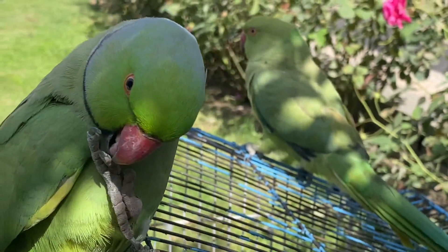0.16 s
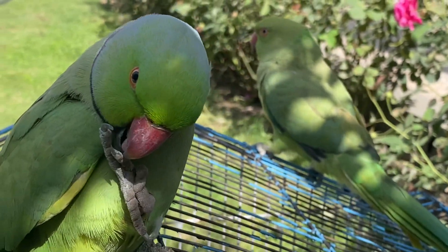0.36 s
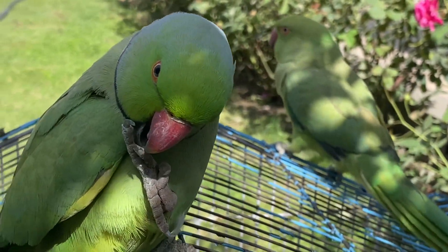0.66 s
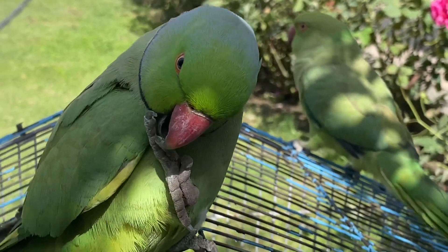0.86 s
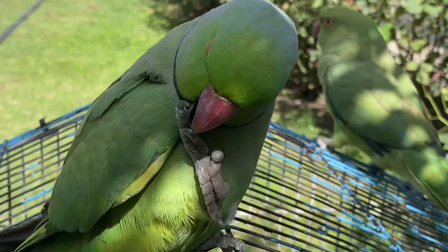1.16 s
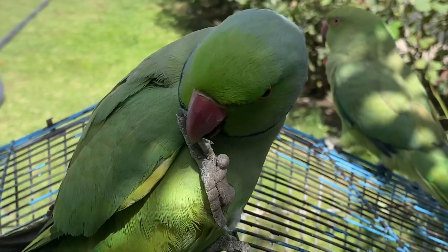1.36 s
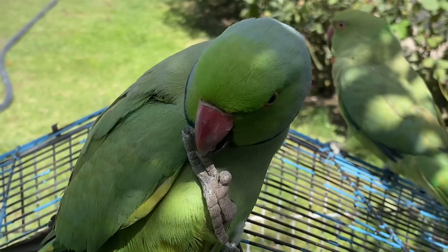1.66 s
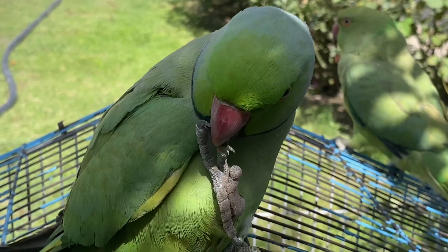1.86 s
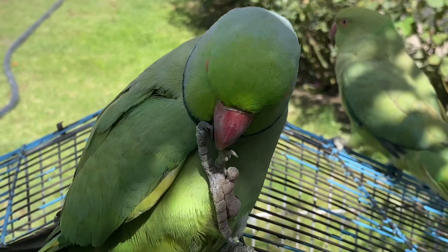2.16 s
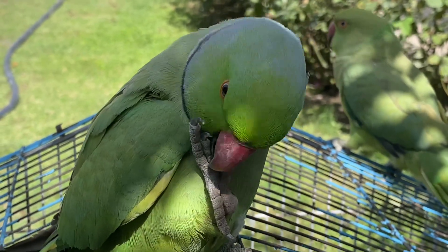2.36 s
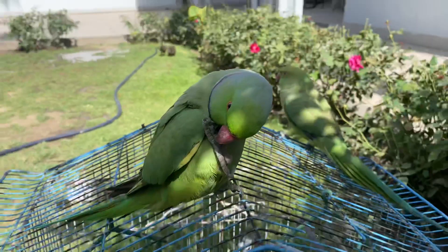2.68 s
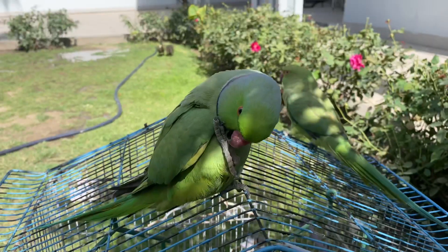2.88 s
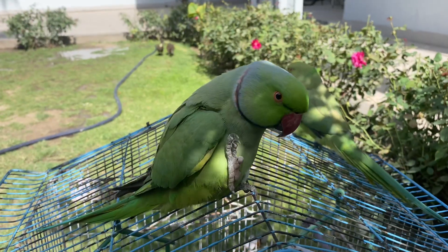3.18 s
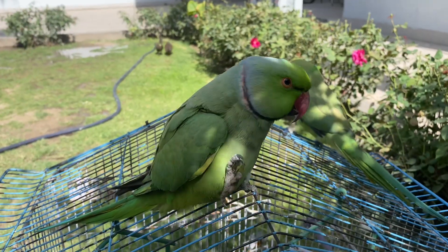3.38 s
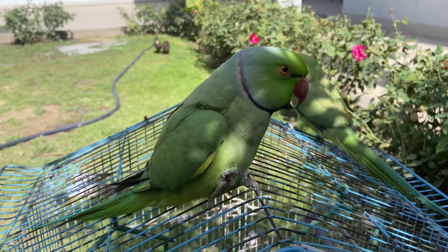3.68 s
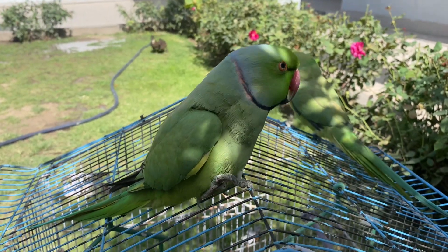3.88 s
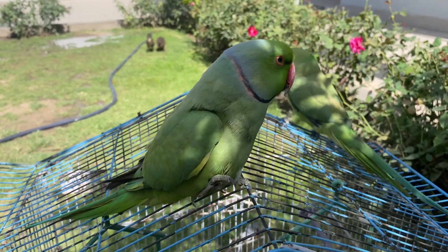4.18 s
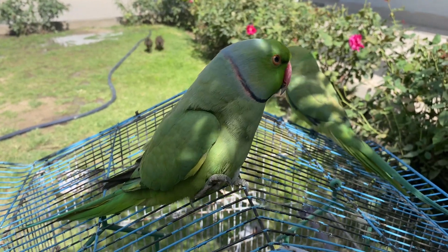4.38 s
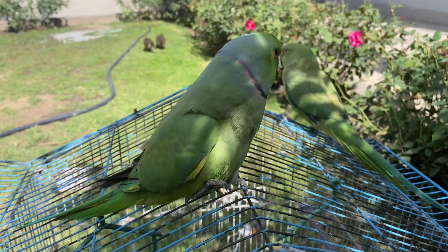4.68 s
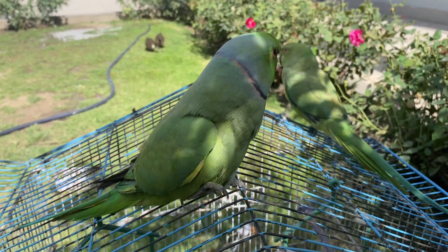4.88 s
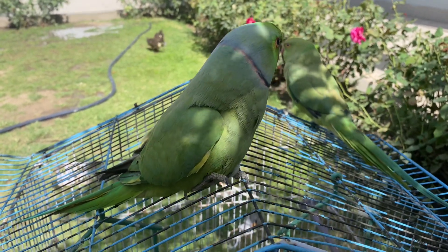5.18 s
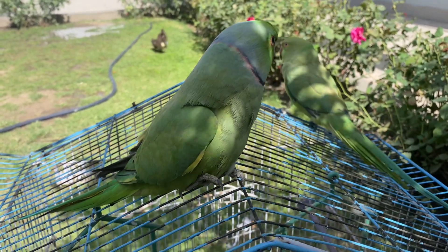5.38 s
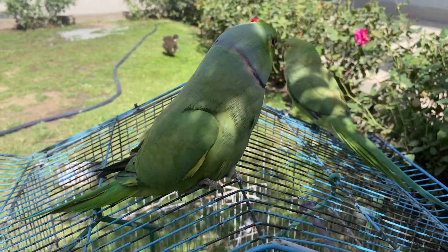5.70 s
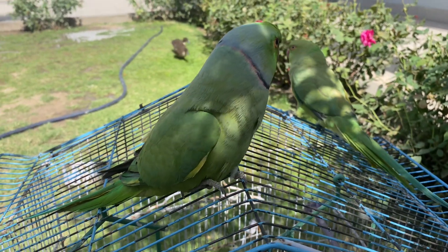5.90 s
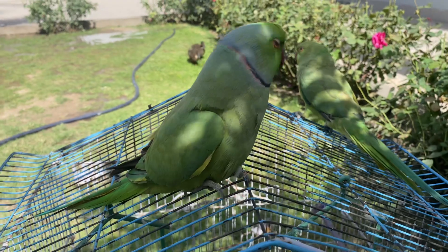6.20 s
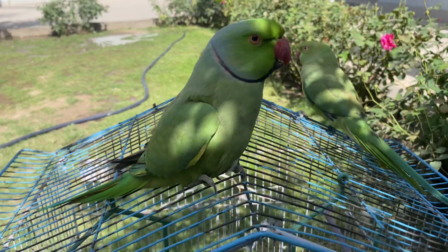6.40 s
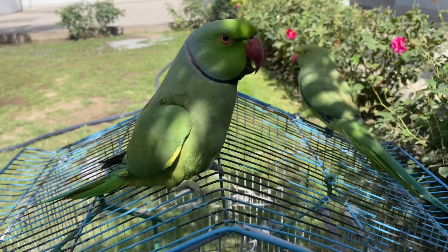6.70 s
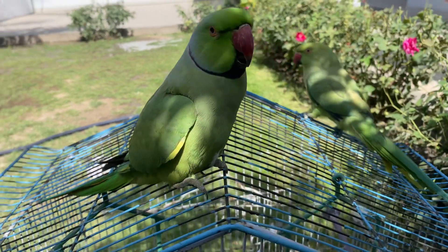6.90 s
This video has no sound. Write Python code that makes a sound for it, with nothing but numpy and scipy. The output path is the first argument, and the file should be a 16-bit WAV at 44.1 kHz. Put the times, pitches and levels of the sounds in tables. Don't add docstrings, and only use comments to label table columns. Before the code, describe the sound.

A garden, heard through a handheld phone microphone: low unsteady wind rumble, soft distant town hiss and a faint deep engine drone. At about 0.5 and 0.8 seconds a close parakeet gives a pair of short, shrill, harsh screeches, each about a fifth of a second, leaping up in pitch then sliding down, with a buzzy edge and slight wall echo. A tiny claw tick on wire follows at 1.4. A second pair comes at 2.2 and 2.6, with dull hand knocks near 2.3 as the narrow sound opens wide. Louder, brighter pairs follow at 3.5 and 3.8, 4.5 and 4.8, 5.4 and 5.75, and 6.5 and 6.8. Soft low thumps fall around 3.4, 3.9 and 4.3. Faint small birds chirp far off in the gaps, and the background dips under the calls until the end near 7 seconds.

```python
import sys
import numpy as np
from scipy import signal
from scipy.fft import rfft, irfft, next_fast_len
from scipy.io import wavfile
from scipy.ndimage import uniform_filter1d

SR = 44100
rng = np.random.default_rng(int(sys.argv[2]) if len(sys.argv) > 2 else 0)


def unload_wav(signal):
    wavfile.write(
        sys.argv[1],
        SR,
        np.round(np.clip(np.atleast_2d(signal).T, -1, 1) * 32767).astype(np.int16),
    )


def to_linear_factor(level_db):
    exponent = np.asarray(level_db, float) / 20
    return 10 ** exponent


N = 310905

# time in seconds, rumble in dB, buffeting above it in dB.
WIND_LEVEL = [(0.0, -43, 1.5), (0.43, -46.5, 4.5), (0.59, -37.5, -3), (1.51, -42.5, 3), (1.59, -37.5, -0.5),
              (3.36, -41, -1), (3.63, -32, -6), (3.79, -57.5, 12), (3.85, -37.5, 0), (4.44, -37.5, -1),
              (4.81, -34.5, 4), (5.06, -47.5, 5.5), (5.52, -47, 3.5), (5.56, -53.5, 5), (6.5, -44.5, 7.5),
              (6.73, -58, 16.5), (6.87, -38.5, 1.5), (7.05, -52.5, 9.5)]
# frequency in Hz, level in dB per Hz.
WIND_TONE = [(12, -46), (20, -28), (36, 4), (60, 7.5), (102, -7.5), (136, -9.5), (264, -22.5), (285, -31),
             (400, -36.5), (520, -61), (880, -120)]
# time in seconds, level in dB.
TOWN_LEVEL = [(0, -56.5), (1.8, -52.5), (3.3, -55.5), (4.6, -53), (6.3, -51), (7.05, -57)]
# frequency in Hz, level in dB per Hz.
TOWN_NARROW = [(180, -27), (300, -3.5), (351, -9), (398, -8), (445, -7), (1410, -14.5), (2190, -17.5),
               (3000, -20), (4240, -26.5), (10100, -38), (13000, -63.5)]
TOWN_WIDE = [(180, -30), (300, 2), (380, -10.5), (418, -3.5), (1030, -7.5), (2090, -15.5), (3460, -19),
             (6600, -32), (7850, -48), (11500, -35), (13000, -49)]
# frequency in Hz, side minus mid in dB.
SIDE_NARROW = [(60, -17), (110, -15), (200, -13), (380, -7), (700, 0), (1290, -4), (2380, -17), (4400, -14),
               (8120, -7), (15000, -5)]
SIDE_WIDE = [(60, -6), (110, -8), (200, -7), (380, -2), (700, 3), (1290, 3), (2380, -1), (4400, 1),
             (8120, -1), (15000, -11)]
# start in seconds, length in seconds, pitch in Hz, spread in Hz, level in dB.
FAR_ENGINES = [
    (0.5, 4.1, 55.4, 10.4, -42.5),
    (1.6, 0.37, 128.7, 3.8, -42.5),
    (6.2, 0.5, 109.2, 6.6, -44.5),
]
# start in seconds, length in seconds, pitch in Hz, spread in Hz, level in dB.
FAR_BIRDS = [
    (0.136, .26, 2900, 150, -72.5),
    (1.70, 0.2, 7200, 250, -69.5),
    (2.102, 0.11, 6830, 500, -66),
    (4.169, 0.12, 11400, 250, -80.5),
    (4.842, 0.034, 1360, 29.8, -48),
    (5.003, 0.13, 11300, 250, -74),
    (6.25, 0.13, 9470, 117, -82),
]
# time in seconds, level in dB.
CLAW_TICKS = [
    (1.364, -59),
    (2.208, -63.5),
]
# time in seconds, level in dB, pitch in Hz.
CASE_KNOCKS = [
    (2.277, -39.5, 147),
    (2.37, -31.5, 139),
    (3.427, -35.5, 122),
    (3.905, -30.5, 99),
    (4.315, -35.5, 118),
]
# echo delay in seconds, level over the scattered tail in dB.
WALLS = [
    (0.029, -4.5),
    (.044, -15),
    (.058, -8.5),
    (.104, -19.5),
]
# delay in seconds, level against the direct sound in dB.
NEAR_ECHOES = [
    (.0023, -23.5),
    (.0061, -14.5),
    (.0104, -23),
    (.0165, -21.5),
]
# start in seconds, length in seconds, then fundamental, octave and overtones in dB.
CALLS = [(0.473, 0.26, -36.5, -31.5, -29), (0.838, 0.21, -35.5, -31, -28.5),
         (2.212, 0.25, -35, -31.5, -28.5), (2.575, 0.2, -34.5, -30.5, -30), (3.503, 0.2, -28.5, -22.5, -17),
         (3.82, .18, -27.5, -25, -20.5), (4.463, 0.19, -28, -27, -24.5), (4.755, 0.2, -28.5, -25.5, -25.5),
         (5.435, 0.21, -28.5, -28.5, -28), (5.752, 0.2, -30, -27, -27.5), (6.472, 0.19, -26, -21.5, -20.5),
         (6.776, 0.18, -28, -24.5, -22)]
# top in Hz, end in Hz, then rise, start of fall and fall in seconds.
ARCHES = [(2545, 1872, 0.082, 0.137, 0.091), (2450, 1757, 0.081, 0.085, 0.089),
          (2437, 1788, 0.096, 0.141, 0.076), (2359, 1709, 0.077, 0.089, 0.068),
          (2435, 1874, 0.078, 0.12, 0.081), (2513, 1735, 0.072, 0.057, 0.1),
          (2337, 1630, 0.107, 0.056, 0.14), (2239, 1683, 0.084, 0.079, 0.081),
          (2030, 1609, 0.104, 0.104, 0.1), (2163, 1672, 0.097, 0.083, 0.1),
          (2295, 1668, 0.088, 0.079, 0.11), (2265, 1710, 0.08, 0.077, 0.085)]
# crest at the top in dB, octave surge in dB, surge before the end in seconds.
ACCENTS = [(2.5, 7, 0.038), (1, 3, .058), (1, 5, .04), (3, 8.5, 0.035), (2.5, 4, 0.036), (2.5, 4.5, .035),
           (-1.5, 6.5, 0.0223), (2.5, 7.5, 0.028), (-0.5, 6, 0.037), (0.5, 8, .034), (4.5, 3, 0.028),
           (2.5, 5.5, 0.028)]
# second membrane in Hz, level swing 0-1, pitch swing in radians, fading 0-1,
# echo in dB, head turn in samples.
PAIRS = [
    (395, 0.039, 0.065, 0.37, -17, 0.027),
    (390, 0.092, 0.061, 0.38, -18, 0.18),
    (400, 0.17, 0.13, 0.12, -27.5, -0.19),
    (390, 0.16, 0.12, 0.41, -25, 0.037),
    (390, 0.09, 0.083, 0.12, -24, 0.1),
    (388, 0.13, 0.11, 0.12, -31.5, 0.47),
]
# attack in dB, attack in seconds,
# swell over the call in dB, release in dB, release in seconds.
EFFORTS = [
    (-14, 0.027, 0, -4, 0.0075),
    (-26, 0.019, 4, -11.5, 0.005),
    (-32, 0.036, 0.5, -17.5, 0.022),
]
# frequency in Hz, gain in dB.
THROAT = [(600, -10.5), (1600, -6), (2300, 5), (3000, 5.5), (3500, 3.5), (5000, -0.5), (5800, -8.5),
          (7000, -8.5), (8000, 0.5), (9800, -11), (11500, -19), (12300, -24), (13300, -67), (14500, -28)]
# frequency in Hz, lead in radians.
LEAD_NARROW = [(1600, 0), (2600, .5), (5000, .65), (6000, -.8), (7000, 0), (7700, 0), (8200, 1.9),
               (9500, 1.6), (10600, 0), (11500, 0), (12600, -2.6)]
LEAD_WIDE = [(1000, .3), (2000, 1.1), (3500, 2.1), (5000, 2.4), (5800, 3.2), (6500, 5.3), (7100, 3.1),
             (8200, 3.8), (9000, 4.4), (9500, 2.4), (10200, .1), (11400, 0), (12300, -1.4)]
# frequency in Hz, left minus right in dB.
SHADOW_WIDE = [(1500, 0.5), (2500, -1), (4500, -0.5), (5800, -8.5), (6500, -4.5), (7200, 8.5), (8300, -1),
               (9300, 6), (10500, -4)]
# frequency in Hz, gain in dB.
BEAM_NARROW = [(3000, 2), (5300, -6.5), (6200, 6.5), (7400, -13), (8500, -3.5), (10000, 6.5), (11500, -8.5),
               (12500, 2.5), (14000, 10.5)]

ZOOM_START_S, ZOOM_END_S = 2.22, 3
GUST_DB = 0.8
GARDEN_T60_S, GARDEN_HZ = 0.64, 6400
START_HZ, RISE_BEND, SAG_HZ_PER_S, SAG_EASE_S = 422.7, 0.84, 2200, 0.015
CREST_S, SURGE_S = 0.016, 0.019
OPEN_S, OPEN_HZ, OPEN_DB, BREATH_DB = 0.028, 2670, 10.5, -20.5
NOTCH_AT_HZ, NOTCH_STEP_HZ, NOTCH_DEPTH, NOTCH_ZOOMING = 2050, 363, 0.53, 0.65
DUCK_DB, DUCK_FROM_DB, DUCK_S = -6.5, -16, 0.45


def colour(table, hz):
    f, v = np.transpose(table)
    return np.interp(np.log(np.maximum(hz, 1.)), np.log(f), v)


def shaped(x, gain):
    length = x.shape[-1]
    size = next_fast_len(length)
    spectrum = rfft(x, size) * gain(np.fft.rfftfreq(size, 1 / SR))
    return irfft(spectrum, size)[..., :length]


def walk(rate, size=N):
    k = int(SR / rate)
    held = np.repeat(rng.standard_normal(size // k + 1), k)
    return 1.91 * uniform_filter1d(uniform_filter1d(held, k), k)[:size]


def add(out, x, s):
    i = int(s * SR)
    out[..., i:i + x.shape[-1]] += x[..., :out.shape[-1] - i]


def background():
    t = np.arange(N) / SR
    opened = np.clip((t - ZOOM_START_S) / (ZOOM_END_S - ZOOM_START_S), 0, 1)
    s, rumble_db, buffet_db = np.transpose(WIND_LEVEL)
    rumble = np.interp(t, s, rumble_db)
    buffet = np.interp(t, s, buffet_db)
    hiss = np.interp(t, *np.transpose(TOWN_LEVEL))
    gust = walk(7.6)
    out = np.zeros((2, N))
    for hz in 25 * 2 ** np.arange(0, 9.2, 1 / 3):
        def band(f):
            return np.cos(np.clip(np.log2((f + 1e-9) / hz) * 3, -1, 1) * np.pi / 2)

        mid, side = shaped(rng.standard_normal((2, N)), band)
        wind = colour(WIND_TONE, hz) + rumble + 21
        wind += np.clip(np.log2(hz / 60), 0, 1) * (buffet + 8)
        wind += GUST_DB * gust + 0.27 * walk(31)
        town = (1 - opened) * colour(TOWN_NARROW, hz) + opened * (colour(TOWN_WIDE, hz) + 0.091)
        town += hiss + 17 + 1.44 * walk(10)
        width = to_linear_factor((1 - opened) * colour(SIDE_NARROW, hz) + opened * colour(SIDE_WIDE, hz))
        level = to_linear_factor(wind) * (hz < 420) + to_linear_factor(town) * (hz > 280)
        out += level * (mid + np.outer([1, -1], width * side))
    return out


def distant(table):
    out = np.zeros(N)
    for s, length, hz, spread_hz, db in table:
        t = np.arange(int(length * SR)) / SR
        noise = rng.standard_normal(len(t) + SR // 2)
        blur = shaped(noise, lambda f: 1 / (1 + ((f - hz) / spread_hz) ** 4))[:len(t)]
        envelope = np.clip(t / 0.0074, 0, 1) * (1 - t / length) ** 0.073
        add(out, to_linear_factor(db) * blur / blur.std() * envelope, s)
    return out


def claw_ticks():
    out, t = np.zeros(N), np.arange(int(0.01 * SR)) / SR
    for s, db in CLAW_TICKS:
        add(out, to_linear_factor(db) * rng.standard_normal(len(t)) * np.exp(-t / 0.0019), s)
    return signal.sosfilt(signal.butter(4, [6000, 12300], "band", fs=SR, output="sos"), out)


def case_knocks():
    out, t = np.zeros(N), np.arange(int(0.04 * SR)) / SR
    envelope = np.exp(-t / 0.0033) * (1 - np.exp(-t / 0.0004))
    sagging = t + 0.0021 * (1 - np.exp(-t / 0.0017))
    for s, db, hz in CASE_KNOCKS:
        add(out, to_linear_factor(db + 10.5) * envelope * np.sin(2 * np.pi * hz * sagging), s)
    return out


def garden():
    t = np.arange(int(0.9 * SR)) / SR
    tail = rng.standard_normal((2, len(t))) * to_linear_factor(-60 * t / GARDEN_T60_S) * np.clip(t / 0.061, 0, 1)
    tail /= np.sqrt(np.sum(tail ** 2) / 2)
    for delay, db in WALLS:
        tail[0, int(delay * SR)] += to_linear_factor(db + 6.0)
    return shaped(tail, lambda f: 1 / (1 + (f / GARDEN_HZ) ** 2) ** 0.5)


def arch(t, top_hz, end_hz, rise, turn, fall):
    up = START_HZ + (top_hz - START_HZ) * np.sin(np.pi / 2 * np.clip(t / rise, 0, 1) ** RISE_BEND)
    held = np.clip(t - rise, 0, max(turn - rise, 0))
    up = up - SAG_HZ_PER_S * held ** 2 / (held + SAG_EASE_S)
    return up - (up - end_hz) * np.sin(np.pi / 2 * np.clip((t - turn) / fall, 0, 1)) ** 2


def effort(t, length, db, attack_db, attack, swell_db, release_db, release):
    start = attack_db * np.exp(-t / attack)
    end = release_db * np.minimum(np.exp((t - length) / release), 1)
    return db + start + swell_db * (t / length - 0.5) + end


def screech(length, levels, accent, bend, beat_hz, swing, twist, fading):
    t = np.arange(int((length + 0.0037) * SR)) / SR
    size = len(t)
    hz = arch(t, *bend)
    crest_db, surge_db, before = accent
    crest = crest_db * np.exp(-((t - bend[2]) / CREST_S) ** 2)
    db = [crest + effort(t, length, level, *rule) for level, rule in zip(levels, EFFORTS)]
    db[1] = db[1] + surge_db * np.exp(-((t - length + before) / SURGE_S) ** 2)
    opening = np.exp(-(t / OPEN_S) ** 2)

    wobble = 0.002 * walk(120, size) + (0.004 + 0.035 * opening) * walk(900, size)
    phase = 2 * np.pi * np.cumsum(hz * (1 + wobble)) / SR
    beat = 2 * np.pi * np.cumsum(beat_hz * (1 + 0.036 * walk(34, size))) / SR
    partials = 0
    for k in range(1, 13):
        fade = 1 - fading * min(0.4 + 0.25 * k, 1.2) * np.clip(walk(130, size), -0.4, 2)
        ring = OPEN_DB * np.exp(-((k * hz - OPEN_HZ) / 900) ** 2) - 2.5
        late_db = -8 * (k > 4) * np.exp(-(t / 0.03) ** 2)
        level = db[min(k, 3) - 1] + colour(THROAT, k * hz) + opening * (k > 2) * ring + late_db
        swinging = 1 + swing * np.cos(beat) + 0.017 * walk(900, size)
        strength = np.sqrt(2) * to_linear_factor(level) * swinging * (k * hz < 16000) * fade
        partials = partials + strength * np.sin(k * phase + twist * k ** 0.8 * np.sin(beat) + k * k)

    air = shaped(rng.standard_normal(size), lambda f: to_linear_factor(colour(THROAT, f)) * np.clip(f / 9000, 0, 1))
    air *= to_linear_factor(db[2] + BREATH_DB + 8.5 * np.exp(-(t / 0.079) ** 2) + 2.0 * walk(66, size))
    rasp = shaped(rng.standard_normal(size), lambda f: 1 / (1 + ((f - OPEN_HZ) / 700) ** 4))
    rasp *= to_linear_factor(levels[0] - 18.5) * opening / rasp.std()
    edges = np.clip(t / 0.0024, 0, 1) * np.clip((t[-1] - t) / 0.016, 0, 1)
    voice = np.pad((partials + air + rasp) * edges, (0, SR))
    return voice + sum(to_linear_factor(echo_db) * np.roll(voice, int(delay * SR)) for delay, echo_db in NEAR_ECHOES)


def wall_notch(voice, start):
    depth = NOTCH_DEPTH * (NOTCH_ZOOMING if start > ZOOM_START_S else 1)
    return shaped(voice, lambda f: 1 - depth * np.exp(-2j * np.pi * (f - NOTCH_AT_HZ) / NOTCH_STEP_HZ))


def two_ports(voice, wide, turn):
    def gain(f):
        lead = colour(LEAD_WIDE if wide else LEAD_NARROW, f) + 2 * np.pi * f * turn / SR
        if wide:
            level_db = np.outer([0.5, -0.5], colour(SHADOW_WIDE, f))
        else:
            level_db = colour(BEAM_NARROW, f)
        return np.exp(np.outer([0.5j, -0.5j], lead)) * to_linear_factor(level_db)

    return shaped(np.array([voice, voice]), gain)


def parakeet():
    out, echo = np.zeros((2, N)), garden()
    for i, (start, length, *levels) in enumerate(CALLS):
        *membranes, echo_db, turn = PAIRS[i // 2]
        voice = screech(length, levels, ACCENTS[i], ARCHES[i], *membranes)
        wide = start > ZOOM_END_S
        mid, side = to_linear_factor(echo_db) * signal.fftconvolve(voice[None], echo, axes=1)[:, :len(voice)]
        if not wide:
            voice = wall_notch(voice, start)
        spread = np.outer([1, -1], side) * (0.8 if wide else 0.25)
        add(out, two_ports(voice + mid, wide, turn) + spread, start)
    return out


def ducking(bird):
    keep = np.exp(-1 / (DUCK_S * SR))
    power = signal.lfilter([1 - keep], [1, -keep], np.mean(bird ** 2, axis=0))
    return to_linear_factor(DUCK_DB * power / (power + to_linear_factor(2 * DUCK_FROM_DB)))


def scene():
    bird = parakeet()
    behind = ducking(bird) * (background() + distant(FAR_ENGINES))
    return bird + behind + case_knocks() + claw_ticks() + distant(FAR_BIRDS)


def band_limit(x):
    return signal.sosfilt(signal.butter(12, 16150, fs=SR, output="sos"), x)


def record(dry):
    rounded = np.tanh(0.93 * dry) / 0.87
    mix = signal.sosfilt(signal.butter(3, 45, "high", fs=SR, output="sos"), rounded)
    return band_limit(mix)


dry = scene()
out = record(dry)
unload_wav(out)
```